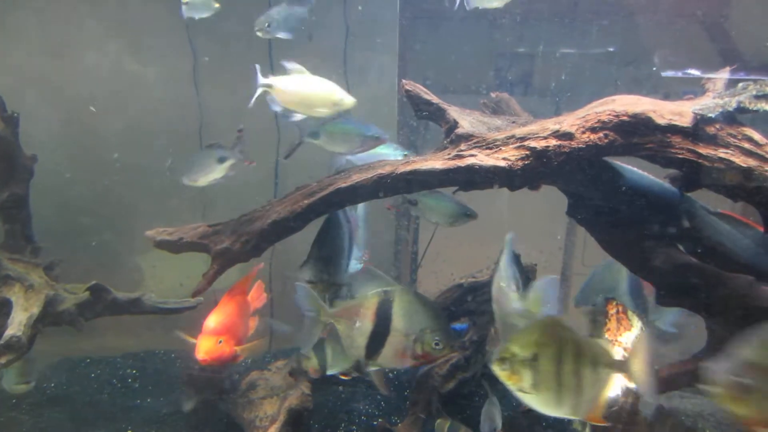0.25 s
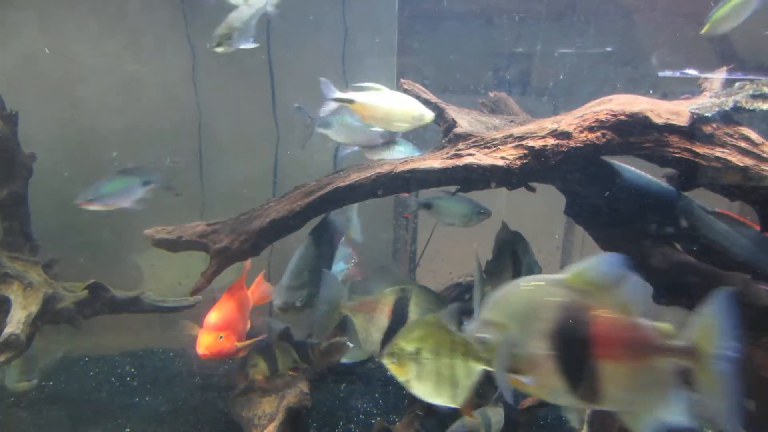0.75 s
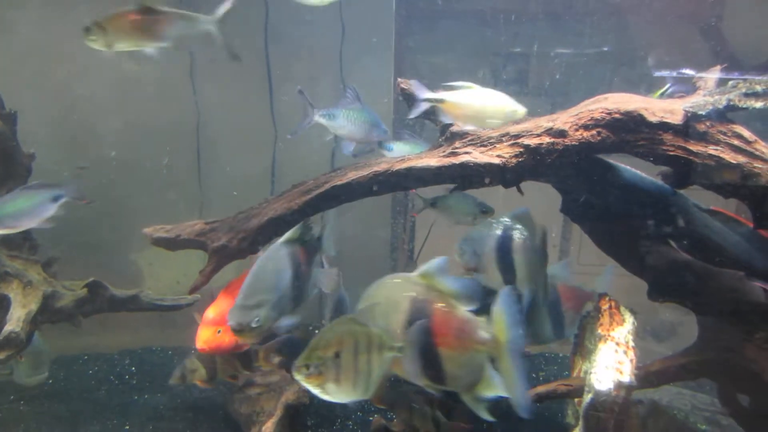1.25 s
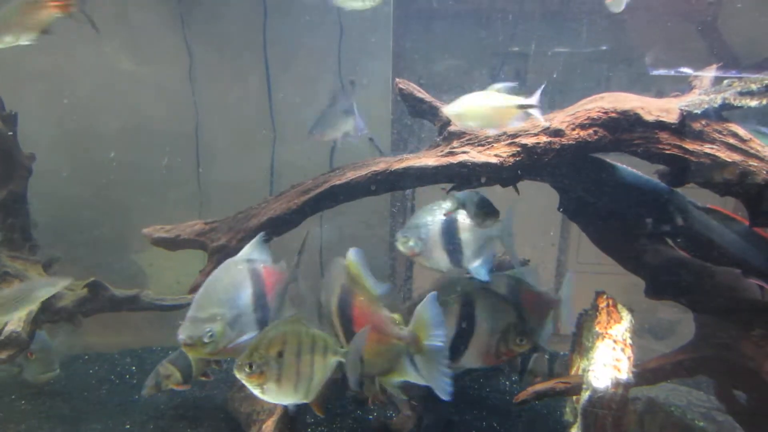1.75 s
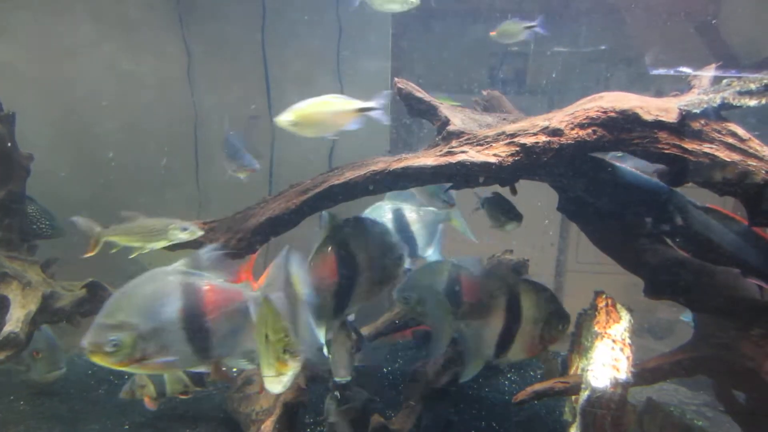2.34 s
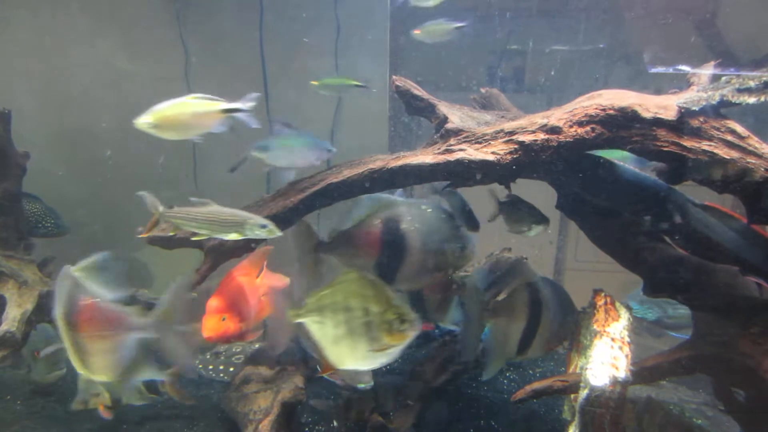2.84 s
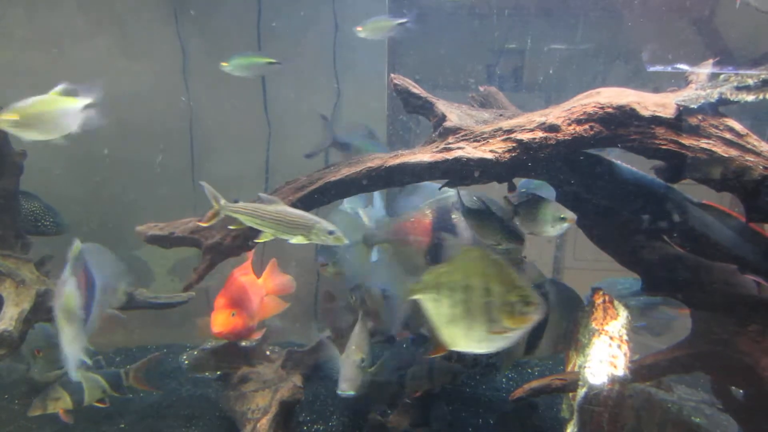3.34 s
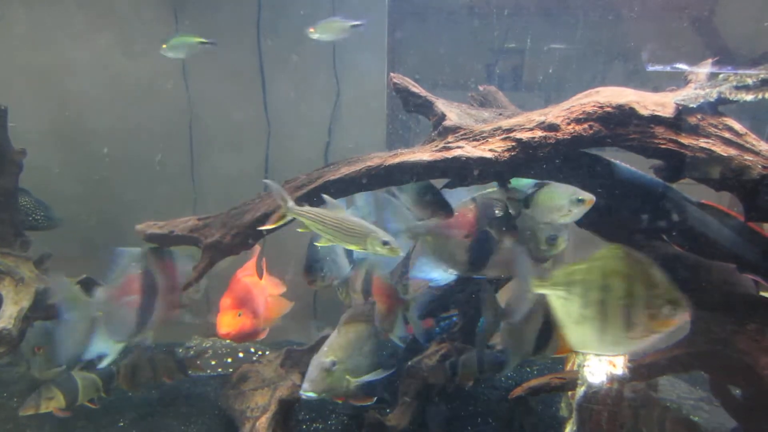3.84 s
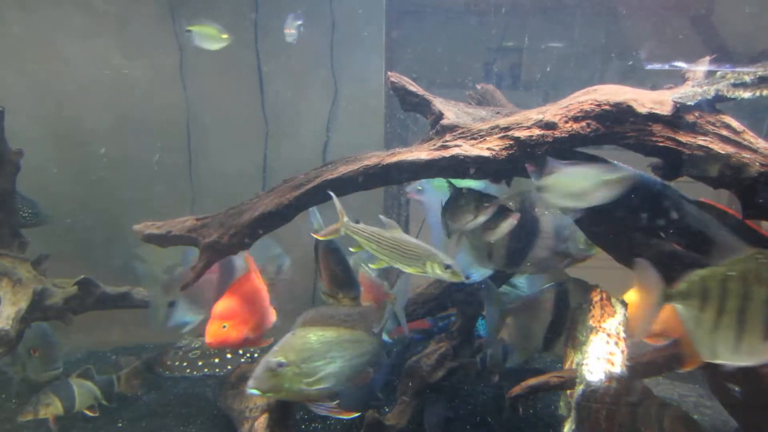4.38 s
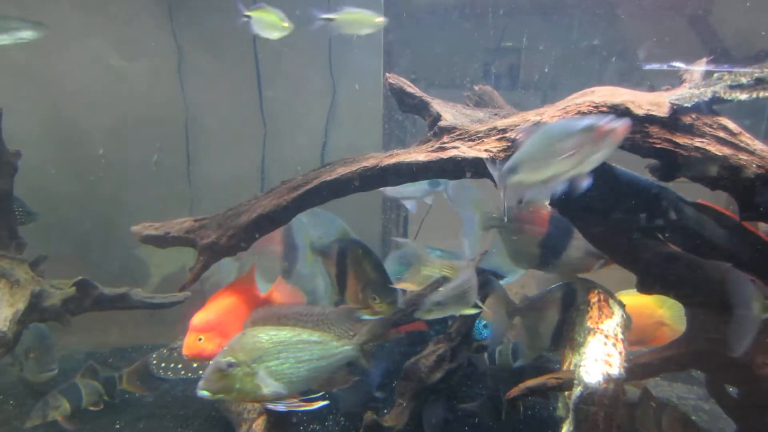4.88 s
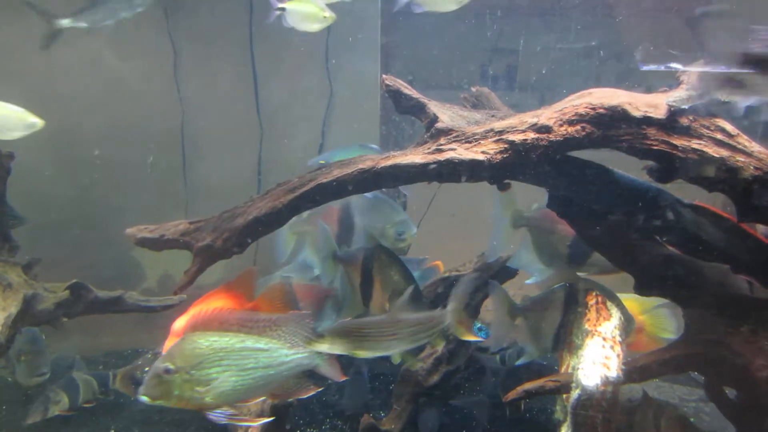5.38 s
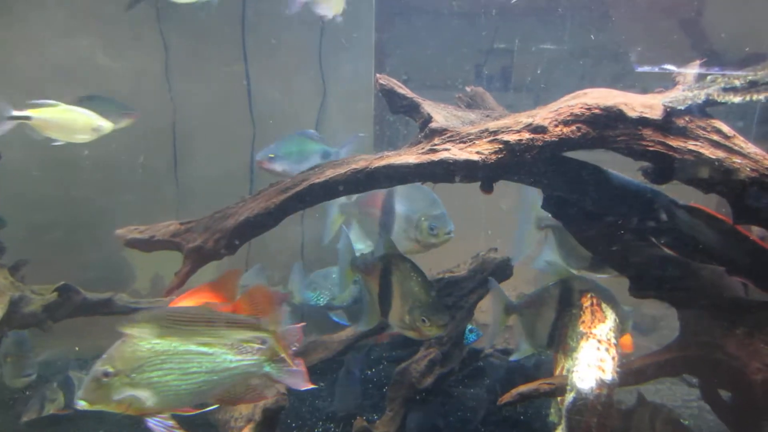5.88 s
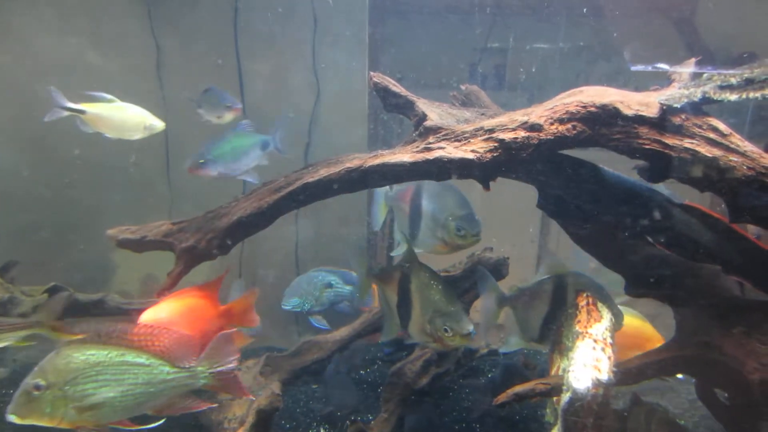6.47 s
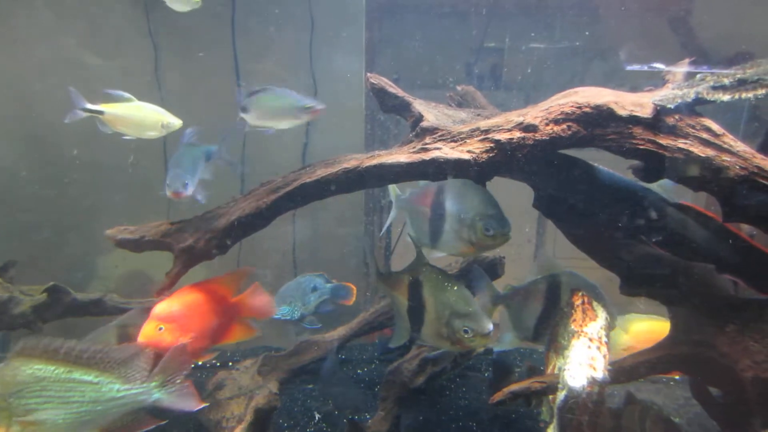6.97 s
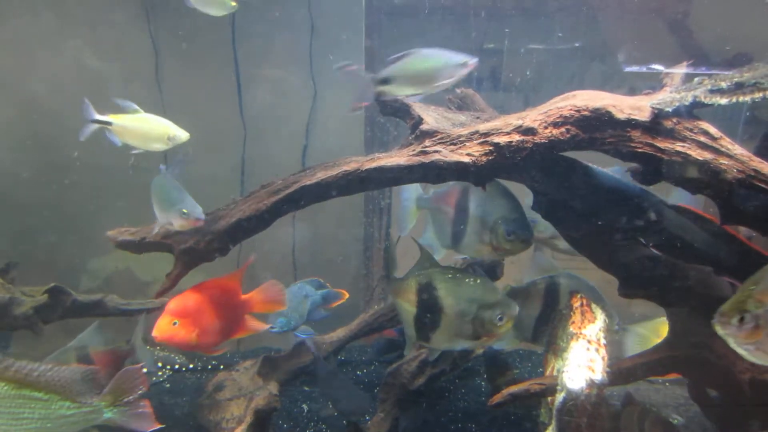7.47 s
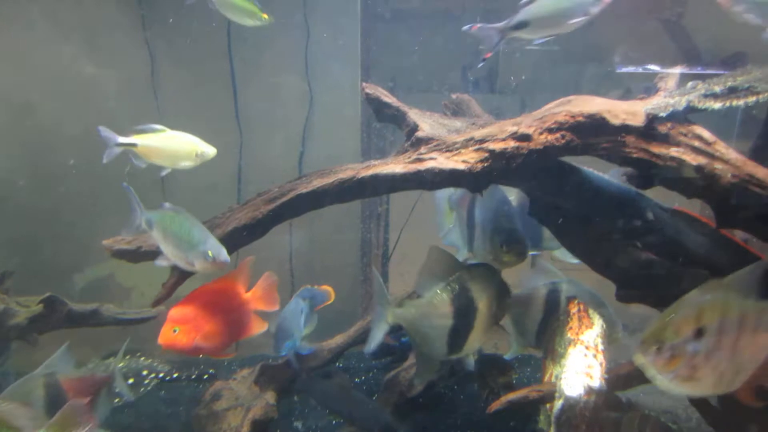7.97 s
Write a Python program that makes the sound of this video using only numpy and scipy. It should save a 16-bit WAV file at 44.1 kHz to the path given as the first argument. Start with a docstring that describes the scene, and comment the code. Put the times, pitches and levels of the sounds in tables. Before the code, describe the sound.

Aquarium equipment hums and slowly throbs over a low water rumble, with small bubbles plopping and fizzing, close up indoors.

```python
"""Large aquarium, close up

Indoors, a camera's stereo microphone close to the tank, which is louder on the left. A mains-driven
pump, a filter motor and a fan hum at three nearly equal speeds and beat against each other. Water
rumbles through the cabinet and rushes back into the tank, where bubbles plop and a fine fizz bursts
on the surface. Behind it all lie a thin hiss and the camera's own faint whine."""
import sys
import numpy as np
from scipy import signal
from scipy.fft import rfft, irfft
from scipy.io import wavfile

SR = 44100
rng = np.random.default_rng(int(sys.argv[2]) if len(sys.argv) > 2 else 0)


def digitize_waveform(pressure):
    """Quantize a signal to 16-bit integers and store it at the path in sys.argv[1].

    Rows of a 2-D input are taken as channels; values are limited to [-1, 1].
    """
    field = np.atleast_2d(pressure).T
    bounded = np.clip(field, -1, 1)
    quanta = np.round(bounded * 32767).astype(np.int16)
    wavfile.write(sys.argv[1], SR, quanta)


N = 362502

# Levels in and around the tank are set before the left and right gains in scene().
# Hum partials of the pump, the filter motor and the fan: multiple_of_speed, rms_db
PUMP_PARTIALS = [(1, -39.5), (2, -39.5), (3, -47.5), (4, -38.5), (5, -43), (6, -52.5), (8, -64), (9, -53.5),
                 (10, -63), (16, -71), (18, -64), (24, -75.5), (27, -78)]
FILTER_PARTIALS = [(1, -56.5), (2, -35.5), (3, -41.5), (4, -38), (5, -42), (6, -33), (7, -51), (8, -54),
                   (9, -65), (11, -66.5), (12, -62.5), (20, -65.5)]
FAN_PARTIALS = [(1, -56.5), (2, -44.5), (3, -44), (5, -38.5), (6, -52), (10, -68), (20, -56.5), (40, -69)]
# Base spectrum of flowing water and air: frequency_hz, density_db
FLOW_SPECTRUM = [(22, -85), (50, -67), (85, -74.5), (140, -64.5), (220, -65), (330, -63), (380, -65),
                 (570, -73.5), (850, -71.5), (1150, -73.5), (1450, -81), (1900, -81.5), (2150, -89.5),
                 (3000, -92.5)]
# Resonances of cabinet and room that lift the flow noise: centre_hz, width_hz, lift_db
CABINET_RESONANCES = [(60.9, 6, 15.5), (75.9, 4.5, 12), (92.8, 8.0, 11), (107.4, 21.3, 21.5),
                      (165.2, 14, 8.5), (246.1, 44.4, 14), (289.8, 19.4, 9.5), (428, 13.6, 6.5),
                      (508, 18.0, 4.1), (1760, 76, 0.5)]
# Likeness of the flow noise on the two sides of the microphone: frequency_hz, coherence
FLOW_COHERENCE = [(60, .999), (300, .997), (640, .97), (1400, .75), (2300, .42), (3200, .1)]
# Spectrum of the background hiss: frequency_hz, density_db
HISS_SPECTRUM = [(1200, -110), (2500, -98), (3600, -93.5), (4100, -96), (4800, -92.5), (6000, -97.5),
                 (7300, -101.5), (9000, -101.5), (11500, -100.5), (13500, -102), (15500, -105)]
# Strength of the stream returning to the tank: time_s, level_db
STREAM_STRENGTH = [(0, 0), (.9, 0.1), (1.7, .8), (3.2, 0.5), (3.7, -.2), (6.0, .2), (8.2, -1.1)]
# The few loud bubbles that stand out of the gurgle: start_s, pitch_hz, level_db
LOUD_PLOPS = [(1.013, 1700, -38), (1.140, 780, -30), (1.626, 705, -31), (2.305, 740, -29),
              (2.585, 1740, -35.5), (2.796, 1700, -33.5), (4.050, 1060, -33), (4.794, 1690, -31),
              (4.797, 680, -25), (7.190, 1630, -37)]
# Lesser bubbles that come at random in a few sizes: pitch_hz, level_db, bubbles_per_s
STRAY_PLOPS = [(880, -38, 1.0), (1703, -41.5, 1.2), (2700, -49, 0.43), (6000, -50, .4)]
# The camera's electronic whine: pitch_hz, left_db, right_db
CAMERA_WHINE = [(7867, -93, -89.5), (15734, -82, -81)]

TIME_S, BIN_HZ = np.arange(N) / SR, np.fft.rfftfreq(N, 1 / SR)


def gain_of(db):
    """Decibels to an amplitude factor."""
    return 10 ** (np.asarray(db) / 20)


def unit_rms(x):
    """Scales to rms 1."""
    return x / np.sqrt(np.mean(x ** 2) + 1e-20)


def curve(points):
    """Interpolates a table onto the FFT bins along a log-frequency axis."""
    hz, value = np.transpose(points)
    return np.interp(np.log(BIN_HZ + 1), np.log(hz + 1), value)


def add(mix, start_s, sound):
    """Mixes a sound in at start_s."""
    part = mix[max(round(start_s * SR), 0):][:len(sound)]
    part += sound[:len(part)]


def drift(rate_hz):
    """Smooth random wander of rms 1."""
    lowpass = (BIN_HZ > 0) * np.exp(-(BIN_HZ / rate_hz) ** 2)
    return unit_rms(irfft(rfft(rng.standard_normal(N)) * lowpass, N))


def chance_times(per_s):
    """Irregular moments at a mean rate."""
    times = np.cumsum(rng.gamma(2, .5, size=100)) / per_s
    return times[times < N / SR]


def stereo_noise(density_db, coherence):
    """Two channels of noise with a given density per Hz and likeness."""
    left, other = rfft(rng.standard_normal((2, N)))
    right = coherence * left + np.sqrt(1 - coherence ** 2) * other
    return irfft(np.array([left, right]) * gain_of(density_db) * np.sqrt(SR / 2), N)


def room(direct, t60_s, wet_db):
    """The microphone hears the direct sound and a short diffuse tail, different on each side."""
    t = np.arange(SR // 2) / SR
    tail = rng.standard_normal((2, len(t))) * gain_of(-60 * t / t60_s)
    tail /= np.linalg.norm(tail, axis=1, keepdims=True)
    return direct + gain_of(wet_db) * signal.fftconvolve(direct[None], tail, axes=1)[:, :N]


def stream_gain(follow):
    """The returning stream drives rush, bubbles and fizz; follow scales its swing in dB."""
    return gain_of(follow * np.interp(TIME_S, *np.transpose(STREAM_STRENGTH)))


def hiss(flicker_db):
    """A thin, flickering hiss in the background, slightly opposed in the two channels."""
    return stereo_noise(curve(HISS_SPECTRUM), coherence=-.092) * gain_of(flicker_db * drift(25))


def fizz(tick_db, spread_db, snap_db, close_snap_s, close_snap_db, decay_s, count):
    """Bubble skins burst on the surface: fine ones tick, larger ones snap, one near the microphone."""
    t, bursts = np.arange(SR // 50) / SR, np.zeros(N)
    fade = np.exp(-t / decay_s)
    for when, pitch, size in rng.random((count, 3)):
        ring = signal.iirpeak(9000 + 6500 * pitch, Q=3, fs=SR)
        tick = fade * unit_rms(signal.lfilter(*ring, rng.standard_normal(len(t))))
        db = tick_db + spread_db * min(-np.log(1 - size), 2.5)
        add(bursts, when * N / SR, gain_of(db) * tick)
    scatters_db = rng.standard_normal(100)
    snaps = fade * rng.standard_normal((100, len(t)))
    for start_s, scatter_db, snap in zip(chance_times(per_s=2.3), scatters_db, snaps):
        add(bursts, start_s, gain_of(snap_db + scatter_db) * snap)
    bursts *= stream_gain(follow=1.8)
    add(bursts, close_snap_s, gain_of(close_snap_db) * fade * rng.standard_normal(len(t)))
    bright = signal.sosfilt(signal.butter(3, [9500, 15500], "band", fs=SR, output="sos"), bursts)
    return room(bright, t60_s=.06, wet_db=-10) * gain_of([[0], [-2]])


def bubble(hz, cycles, rise):
    """A bubble rings, falling by 1/e in the given cycles and rising in pitch as it nears the surface."""
    age = np.arange(int(6 * cycles / hz * SR)) / SR * hz / cycles  # in decay times
    envelope = (1 - np.exp(-6 * age)) * np.exp(-age)
    return envelope * np.sin(2 * np.pi * cycles * age * (1 + rise * age))


def plop(hz, db):
    """One distinct bubble of nearly steady pitch; smaller, higher ones ring for more cycles."""
    return gain_of(db) * bubble(hz, cycles=6.3 * np.sqrt(hz / 700), rise=.0027)


def gurgle(small_db, spread_db, treble_fall_db, scatter_octaves, count):
    """Many small bubbles ring under the outlet, with stray plops and a few loud ones among them."""
    bubbles = np.zeros(N)
    for when, pitch, size in rng.random((count, 3)):
        hz = 650 * 3.4 ** pitch
        db = small_db + spread_db * min(-np.log(1 - size), 3) - treble_fall_db * pitch
        add(bubbles, when * N / SR, gain_of(db) * bubble(hz, cycles=6.4, rise=.01))
    for hz, db, per_s in STRAY_PLOPS:
        for start_s, (detune, scatter_db) in zip(chance_times(per_s), rng.standard_normal((100, 2))):
            add(bubbles, start_s, plop(hz * 2 ** (scatter_octaves * detune), db + scatter_db))
    bubbles *= stream_gain(follow=1.5)
    for start_s, hz, db in LOUD_PLOPS:
        add(bubbles, start_s, plop(hz, db))
    return room(bubbles, t60_s=.16, wet_db=-6)


def flow(flutter_db, bottom_hz, top_hz):
    """Turbulence booms in the cabinet; the rush of the outlet above it swells with the stream."""
    lift_db = sum(db / (1 + (2 * (BIN_HZ - centre) / width) ** 2)
                  for centre, width, db in CABINET_RESONANCES)
    rolloff_db = -10 * np.log10((1 + (BIN_HZ / top_hz) ** 8) * (1 + (bottom_hz / (BIN_HZ + 1)) ** 6))
    water = stereo_noise(curve(FLOW_SPECTRUM) + lift_db + rolloff_db, curve(FLOW_COHERENCE))
    rush = signal.sosfiltfilt(signal.butter(2, 550, "high", fs=SR, output="sos"), water)
    rumble = water - rush
    return rumble + rush * stream_gain(follow=.6) * gain_of(flutter_db * drift(11))


def machine_hum(speed_hz, partials, wander_hz, waver_db=0):
    """Partials locked to one shaft whose speed wanders; waver_db lets each waver in level."""
    turns = np.cumsum(speed_hz + wander_hz * drift(.4)) / SR
    hum = np.zeros(N)
    for multiple, db in partials:
        amplitude = np.sqrt(2) * gain_of(db + waver_db * drift(1))
        hum += amplitude * np.sin(2 * np.pi * (multiple * turns + rng.random()))
    return hum


def scene():
    """Beside the tank: three machines beat over the water, all louder on the microphone's left."""
    hum = machine_hum(59.972, PUMP_PARTIALS, wander_hz=.0069)
    hum += machine_hum(58.045, FILTER_PARTIALS, wander_hz=.0067, waver_db=1.27)
    hum += machine_hum(55.81, FAN_PARTIALS, wander_hz=.012)
    water = flow(flutter_db=.72, bottom_hz=26, top_hz=2920)
    background = hiss(flicker_db=.62)
    water += gurgle(small_db=-43, spread_db=3.5, treble_fall_db=12, scatter_octaves=.17, count=700)
    water += fizz(tick_db=-64.5, spread_db=4.5, snap_db=-51, close_snap_s=7.3305, close_snap_db=-37,
                  decay_s=.0028, count=450)
    return (background + water + hum) * gain_of([[3.5], [-5]])


def record(dry):
    """The camera notches the band around its own whine, a trace of which remains, and cuts the top."""
    notch_hz, notch_width_hz, top_hz = 7867, 3400, 15800
    offset_hz = BIN_HZ - notch_hz
    notch = abs(offset_hz) / np.hypot(offset_hz, notch_width_hz / 2)
    out = irfft(rfft(dry) * notch, N)
    for hz, left_db, right_db in CAMERA_WHINE:
        out += np.sqrt(2) * gain_of([[left_db], [right_db]]) * np.sin(2 * np.pi * hz * TIME_S)
    lowpass = signal.firwin(2047, top_hz, window=("kaiser", 9), fs=SR)
    return signal.oaconvolve(out, lowpass[None], "same")


dry = scene()
out = record(dry)
digitize_waveform(out)
```